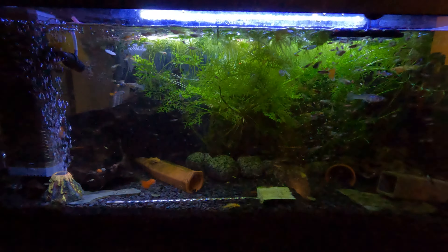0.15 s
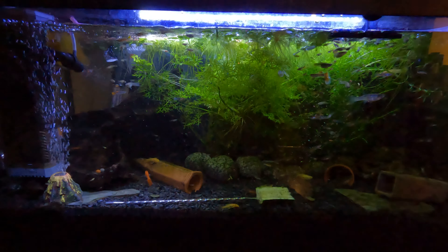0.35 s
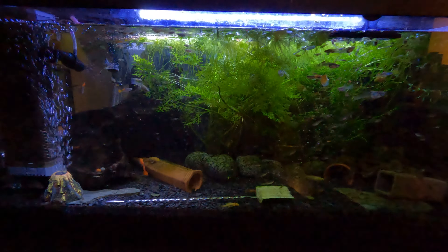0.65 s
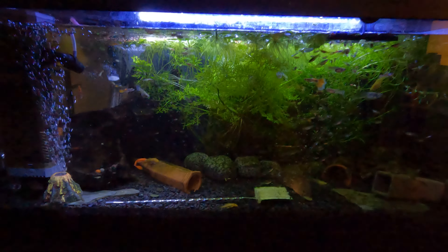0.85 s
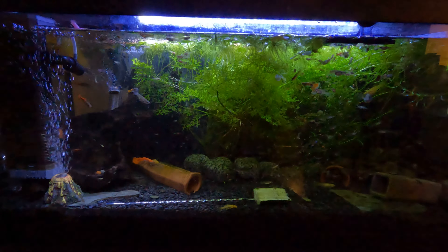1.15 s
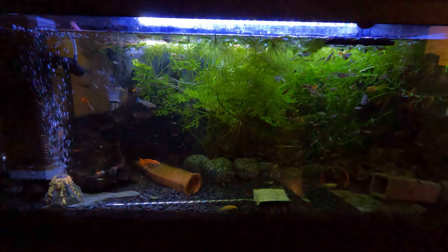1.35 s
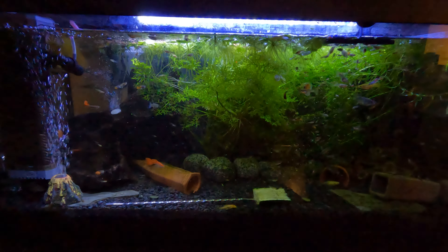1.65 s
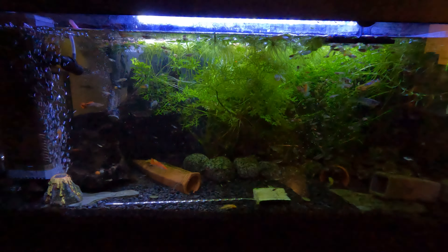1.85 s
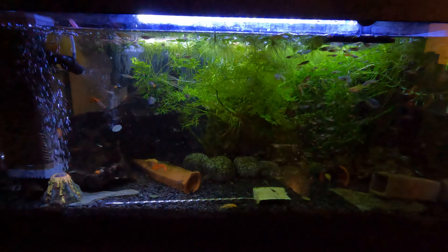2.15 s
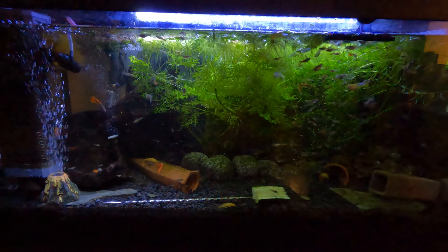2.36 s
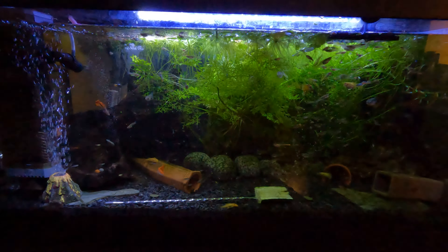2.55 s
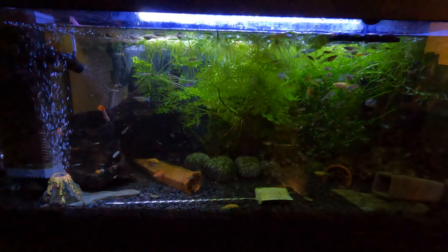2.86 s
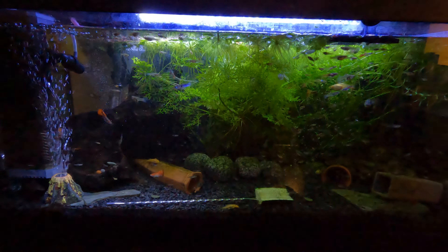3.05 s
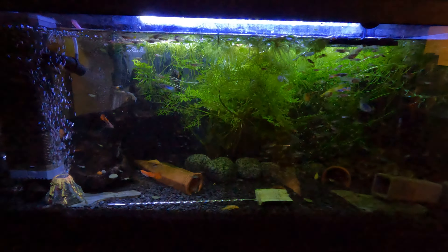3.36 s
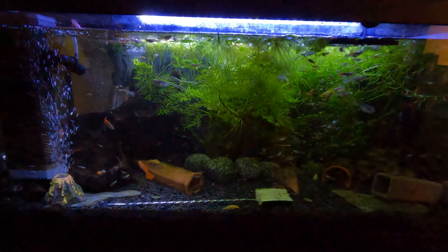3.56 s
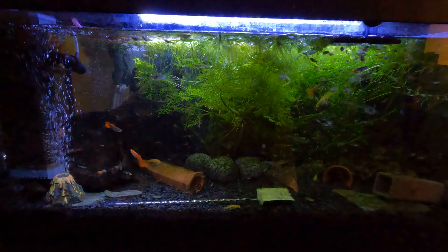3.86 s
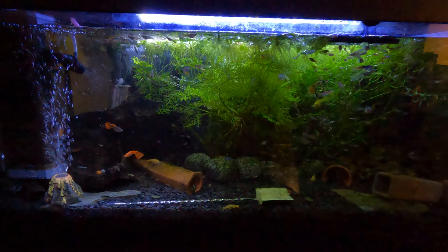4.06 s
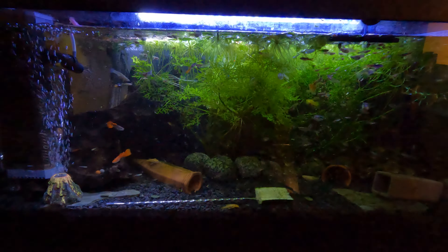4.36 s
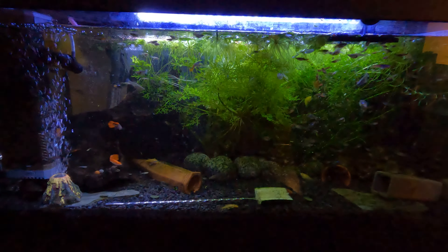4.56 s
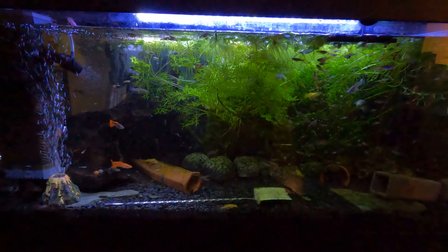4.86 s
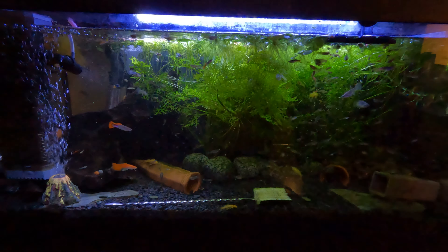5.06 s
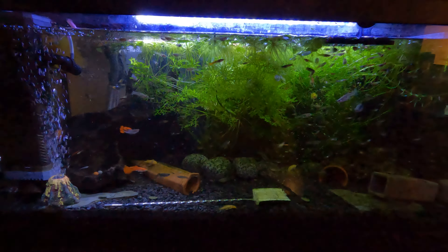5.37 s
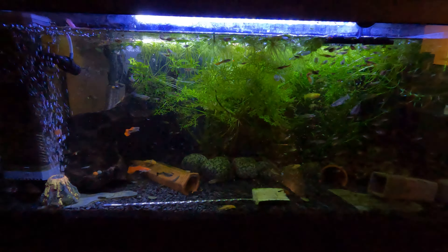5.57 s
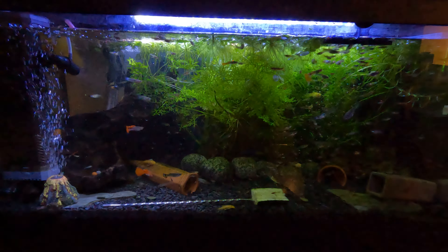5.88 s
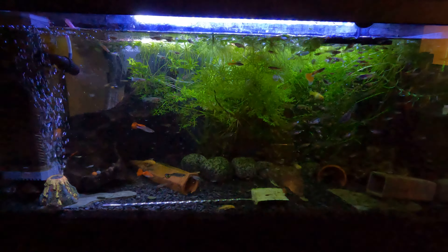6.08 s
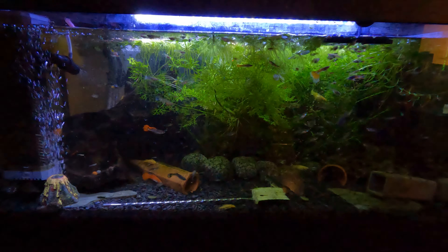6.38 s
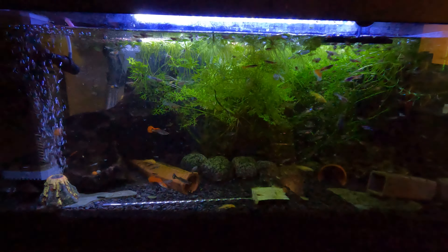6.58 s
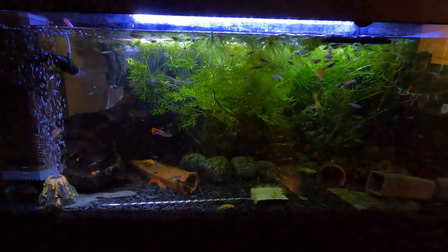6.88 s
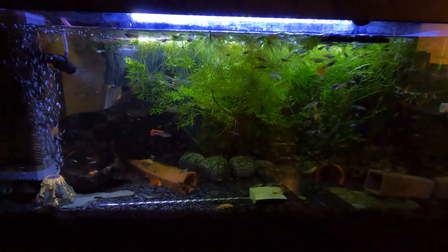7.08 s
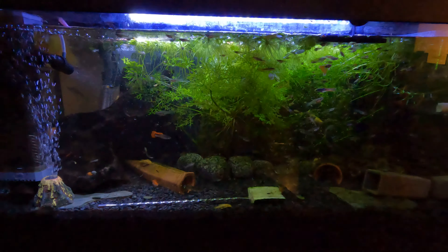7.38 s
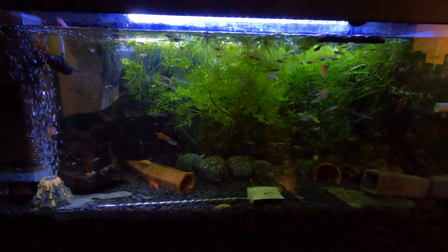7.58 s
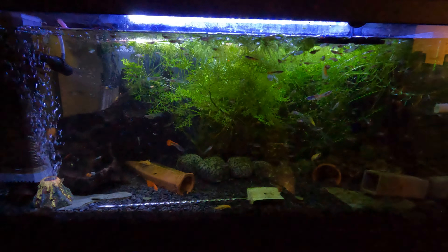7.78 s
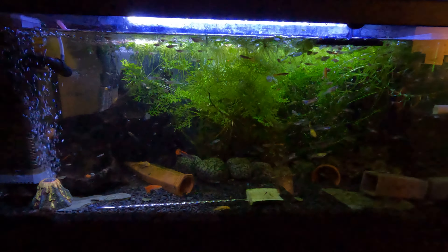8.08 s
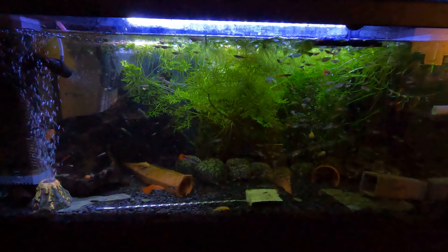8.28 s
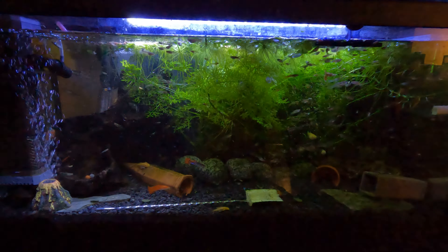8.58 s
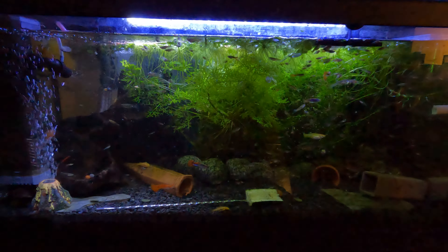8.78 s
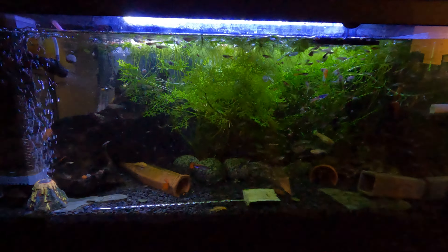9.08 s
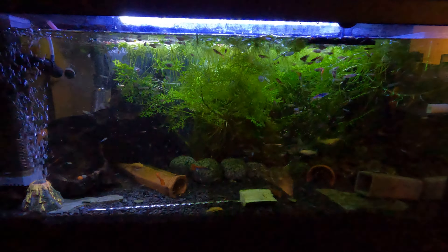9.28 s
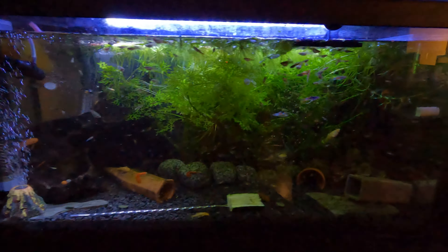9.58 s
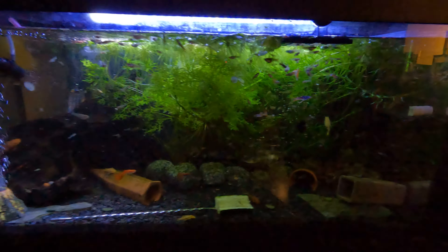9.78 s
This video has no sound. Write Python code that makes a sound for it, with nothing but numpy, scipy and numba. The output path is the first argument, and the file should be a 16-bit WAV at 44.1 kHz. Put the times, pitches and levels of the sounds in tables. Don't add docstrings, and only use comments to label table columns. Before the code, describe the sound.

An aquarium air pump hums low and steady while bubbles pop, tick and fizz at the water surface in uneven surges.

```python
import sys
import numpy as np
from scipy import signal
from scipy.fft import rfft, irfft
from scipy.io import wavfile
from scipy.ndimage import uniform_filter1d
from numba import njit

SR = 44100
rng = np.random.default_rng(int(sys.argv[2]) if len(sys.argv) > 2 else 0)


def generate_wav(sig):
    pcm = np.round(np.clip(np.atleast_2d(sig).T, -1, 1) * 32767).astype(np.int16)
    wavfile.write(sys.argv[1], SR, pcm)


def boost_factor(decibels):
    exponent = np.asarray(decibels, float) / 20
    return 10 ** exponent


N = 437913

# centre_hz, width_hz, gain_db
LID_MODES = [(810, 170, 0), (1230, 14, 0.5), (1132, 24, 0.5), (1428, 115, 5), (1530, 78, 3),
             (2340, 250, 1.5), (3640, 41, 6), (4120, 66, 3), (5087, 87, 2.5), (6380, 130, -5),
             (6805, 240, -5.5)]
# freq_hz, density_db_per_hz
SURFACE_COLOUR = [(510, -23.5), (860, -15.5), (1210, -7), (1450, -11.5), (1670, -12.5), (1960, -8.5),
                  (2410, -3), (2920, 0), (3590, -2), (4920, 2), (6050, -1.5), (6820, 9.5), (8280, -12),
                  (11800, -17.5), (15600, -36)]
SPOTS = 6
CLOSE_DB = -5


def surface():
    gulp_db, large_db, middling_db, fine_db = stream()
    tiny = signal.butter(4, 3100, "high", fs=SR, output="sos")
    heard = 0
    for spot in range(SPOTS):
        here = slice(spot, None, SPOTS)
        gulps = swarm(gulp_db - 8.5, 388, 631, cycles=0.99, spread_db=1.3, glide=0.082, count=350)
        large = swarm(large_db - 12.5, 883, 1590, cycles=2.94, spread_db=3.06, glide=0.035, count=450)
        middling = swarm(middling_db - 12, 1640, 3420, cycles=1.5, spread_db=3.8, glide=0.018, count=600)
        fine = swarm(fine_db - 15, 3190, 8850, cycles=3.6, spread_db=3.9, glide=0.025, count=1500)
        spray = swarm(fine_db - 23.5, 10000, 15800, cycles=3.4, spread_db=5, glide=0.022, count=1200)
        mist = swarm(-75, 3070, 13060, cycles=2.4, spread_db=5.5, glide=0., count=6000)
        small = signal.sosfilt(tiny, fine + spray + mist + film_tears(TEARS[here]))

        popped = large_bursts(louder(LARGE[here], -4.5))
        popped = popped + middling_bursts(louder(MIDDLING[here], -2.5))
        popped = popped + signal.sosfilt(tiny, small_pings(louder(SMALL[here], -2.5)))
        heard = heard + tank(gulps + large + middling + small + popped)
        heard[0] += boost_factor(CLOSE_DB) * popped

    lid_db = lambda hz: humps(LID_MODES, hz) + 0.5 * on_log(SURFACE_COLOUR, hz) + 4.22
    return pair(*colour(heard, lid_db))


# start_s, peak_db, pitch_hz
LARGE_BUBBLES = [(0.113, -44.5, 1540), (0.192, -45, 1140), (0.213, -47, 945), (0.282, -46, 1540),
                 (0.408, -49, 953), (0.483, -41, 1230), (0.583, -57, 1410), (0.645, -48, 1040),
                 (0.691, -50, 1240), (0.818, -46, 1250), (1.057, -49, 1160), (1.129, -45, 1510),
                 (1.206, -43, 1240), (1.308, -50, 1530), (1.641, -36, 1230), (1.709, -42, 939),
                 (1.954, -44, 1220), (2.211, -43, 1230), (2.255, -43.5, 1230), (2.305, -46, 1240),
                 (2.365, -48, 1220), (2.435, -44.5, 1230), (2.487, -50, 1230), (2.519, -41.5, 1460),
                 (2.648, -53, 1196), (2.684, -45.5, 1240), (2.847, -46.5, 1400), (2.907, -46, 1150),
                 (2.994, -55, 1530), (3.021, -48, 1210), (3.067, -46.5, 1230), (3.108, -47, 1130),
                 (3.162, -42, 1250), (3.255, -52, 1090), (3.293, -42, 1400), (3.365, -46, 1157),
                 (3.504, -49, 1400), (3.639, -52, 982), (3.738, -48, 1230), (3.808, -45, 1530),
                 (3.869, -43, 1390), (3.888, -42, 1404), (4.048, -48, 1200), (4.089, -43.5, 1400),
                 (4.13, -43.5, 1120), (4.333, -44, 1210), (4.376, -42, 1160), (4.532, -49, 1230),
                 (4.591, -41, 1210), (4.65, -44, 1210), (4.709, -44, 1230), (4.755, -46, 1230),
                 (4.9, -50, 1210), (4.962, -51, 1130), (5.001, -53, 1150),
                 (5.001, -53, 1390), (5.132, -46, 1480), (5.405, -40, 1520), (5.501, -47, 1230),
              (5.65, -42.5, 1230), (5.69, -53, 1010), (5.713, -46, 1230), (5.838, -54, 1020),
              (5.94, -47, 1030), (6.101, -49, 1220), (6.146, -42, 1470), (6.199, -49, 1290),
              (6.294, -51, 1150), (6.329, -48, 1220), (6.579, -50, 1020), (6.638, -49, 1220),
              (6.794, -42, 1380), (6.845, -51, 1030), (6.868, -45, 1280), (7.078, -35, 1230),
              (7.193, -46, 1010), (7.215, -51, 1180), (7.338, -49, 1210), (7.45, -51, 1210),
              (7.537, -44, 1410), (7.563, -46, 1530), (7.71, -39.5, 1306), (7.77, -38, 1530),
              (7.905, -52, 1320), (7.953, -49, 1390), (8.1, -48, 1090), (8.135, -43.5, 1463),
              (8.191, -44, 1200), (8.22, -35, 1530), (8.302, -50, 1210), (8.394, -50, 1230),
              (8.512, -49, 1230), (8.561, -43, 1510), (8.598, -45, 1220), (8.988, -48, 1450),
              (9.13, -44, 1270), (9.192, -53, 1230), (9.235, -49, 1220), (9.352, -52.5, 1430),
              (9.481, -48, 1340), (9.535, -40, 1310), (9.684, -55, 1250), (9.739, -49, 1460),
              (9.861, -48, 960), (9.917, -45, 1210)]
LARGE = LARGE_BUBBLES


def large_bursts(rows):
    start_s, peak_db, pitch_hz = np.transpose(rows)
    start = (start_s * SR).astype(int)
    cycles = 6.2 * (0.5 + rng.random(len(start)))
    ring = grains(start, pitch_hz, cycles, boost_factor(peak_db + 0.1), 0.009)
    return ring + dull_tick(start, peak_db + 1)


# start_s, peak_db, pitch_hz
MIDDLING = [(0.109, -44, 2450), (0.1496, -46, 2400), (0.4827, -43.5, 2460), (0.5893, -47.5, 3150),
            (0.8948, -46, 2480), (1.482, -49.5, 3140), (1.6177, -54, 3130), (2.833, -46.5, 2430),
            (2.992, -43, 3300), (3.1605, -42.5, 3240), (3.2868, -48, 2430), (3.5, -49, 2220),
            (3.6361, -57, 2170), (3.7878, -41.5, 3150), (3.8654, -44, 2900), (4.0701, -64, 3270),
            (4.7557, -45.5, 1880), (5.002, -50, 2180), (5.4064, -44, 3120), (5.498, -50, 3110),
            (6.295, -45.5, 3080), (6.548, -50, 2730), (6.867, -40.5, 2340), (6.9112, -40.5, 2600),
            (7.078, -40, 2150), (7.1092, -38, 2500), (8.2064, -39.5, 2330), (8.7754, -49.5, 2430),
            (8.964, -49.5, 2340), (9.4983, -51.5, 2710)]
# freq_hz, level_db
OVERTONES = [(2400, -12), (3640, -12), (4830, 0.5), (6800, 2), (9500, -6)]


def middling_bursts(rows):
    start_s, peak_db, pitch_hz = np.transpose(rows)
    count = len(start_s)
    start = (start_s * SR).astype(int)
    chance = rng.random((count, 14)).T
    out = grains(start, pitch_hz, 6.4 * (0.5 + chance[0]), boost_factor(peak_db - 5.5), 0.004)
    out += dull_tick(start, peak_db + 9)
    again = start + (SR * (0.0055 + 0.02 * chance[1])).astype(int)
    again_hz = pitch_hz * (0.85 + 0.3 * chance[2])
    out += grains(again, again_hz, np.full(count, 5.0), boost_factor(peak_db - 6), 0.01)
    for k, (tone_hz, tone_db) in enumerate(OVERTONES):
        size = boost_factor(peak_db + tone_db - 5 - 8.5 * chance[3 + k])
        detuned_hz = tone_hz * (0.946 + 0.067 * chance[8 + k])
        out += grains(start, detuned_hz, np.full(count, 8.1), size, 0.)
    return out


# start_s, peak_db, pitch_hz
SMALL_BUBBLES = [(0.0498, -40, 3950), (0.1106, -36, 3450), (0.2957, -51, 4420), (0.4005, -50, 4830),
                 (0.4833, -41, 3670), (0.5556, -52, 3640), (0.8165, -46, 5040), (0.8854, -47, 4200),
                 (1.043, -36, 4800), (1.2885, -47, 4970), (1.3094, -44, 4820), (1.481, -38, 4750),
                 (1.618, -36, 4910), (2.0393, -50.5, 3670), (2.148, -39, 4120), (2.2114, -39, 4830),
                 (2.4379, -50, 4050), (2.5242, -47, 4820), (2.6249, -48, 4820), (2.6858, -51, 3630),
                 (2.9088, -40.5, 4800), (3.1438, -42, 5030), (3.1622, -43, 4810), (3.2819, -38, 4110),
                 (3.3643, -51, 4450), (3.5009, -37, 4160), (3.5932, -52, 4940), (3.7888, -38, 4150),
                 (3.8626, -42, 4320), (3.932, -44.5, 4490), (3.9465, -43, 4840), (4.0412, -38, 4900),
                 (4.0701, -44, 4950), (4.0881, -44, 4820), (4.1285, -44, 4110), (4.1594, -47, 4120),
                 (4.2313, -40.5, 4810), (4.3745, -42, 3570), (4.4079, -46, 6590), (4.4538, -46, 3920),
                 (4.5775, -41, 3730), (4.6453, -41, 3880), (4.7022, -45, 3700), (4.7566, -51, 4430),
                 (4.8614, -40.5, 6700),
                 (5.2243, -38, 7700), (5.4075, -44, 3900), (5.5007, -47, 4820), (5.5551, -44, 4140),
              (5.6459, -44, 3670), (5.808, -49, 4970), (5.9395, -39, 4820), (6.011, -45, 6840),
              (6.1143, -48, 4380), (6.223, -48, 5540), (6.5498, -44, 3310), (6.5688, -38, 4800),
              (6.8461, -48, 7110), (6.866, -48, 3530), (6.905, -39, 4820), (6.9265, -36.5, 6600),
              (7.0567, -43, 4770), (7.0811, -36, 3600), (7.5336, -47, 3700), (7.6453, -45, 4850),
              (7.7087, -41.5, 3670), (7.7675, -43, 4100), (7.8893, -47, 4810), (7.9461, -42, 4820),
              (8.0309, -48, 3660), (8.1307, -44.5, 3580), (8.1821, -51, 4090), (8.2165, -39, 6900),
              (8.2855, -43, 6840), (8.3707, -46, 4840), (8.4575, -41, 3620), (8.4964, -43, 3570),
              (8.5413, -44, 3640), (8.5612, -43, 4820), (8.5964, -39.5, 3610), (8.7738, -45, 3480),
              (8.7942, -41, 4170), (8.9123, -42.5, 7140), (8.9708, -38, 3560), (9.0771, -46, 4950),
              (9.1559, -43, 6690), (9.2292, -42, 3870), (9.3265, -44, 7270), (9.3509, -53, 4010),
              (9.4767, -45, 3970), (9.5116, -39, 6640), (9.5926, -42, 3600), (9.6812, -46, 4760),
              (9.751, -40, 4800), (9.9157, -42, 7000)]
SMALL = SMALL_BUBBLES


def small_pings(rows):
    start_s, peak_db, pitch_hz = np.transpose(rows)
    count = len(start_s)
    start = (start_s * SR).astype(int)
    chance = rng.random((count, 14)).T
    out = grains(start, pitch_hz, 11 * (0.5 + chance[0]), boost_factor(peak_db - 9), 0.0016)
    tick_hz = 8000 * 1.45 ** chance[1]
    out += grains(start, tick_hz, np.full(count, 1.3), boost_factor(peak_db - 10 * chance[2]), 0.)
    for k, (tone_hz, _) in enumerate(OVERTONES[1:4]):
        size = boost_factor(peak_db - 9 - 8.8 * chance[3 + k])
        detuned_hz = tone_hz * (0.97 + 0.06 * chance[8 + k])
        out += grains(start, detuned_hz, np.full(count, 10.0), size, 0.)
    return out


# start_s, peak_db
TEARS = [(1.0425, -66), (1.6182, -58), (2.1301, -61), (2.1924, -54), (3.4835, -55), (3.6321, -59),
         (3.7873, -54), (4.0357, -48), (5.4016, -55), (7.887, -58), (8.2601, -51), (8.5972, -42.5),
         (8.9725, -48), (9.0768, -47), (9.3267, -48)]


def film_tears(rows):
    start_s, peak_db = np.transpose(rows)
    start = (start_s * SR).astype(int)
    cycles = np.full(len(start), 3.4)
    out = 0
    for low_hz, chance in zip((7300, 10500), rng.random((len(start), 2)).T):
        out = out + grains(start, low_hz * (1 + 0.47 * chance), cycles, boost_factor(peak_db + 11), 0.)
    return out


def dull_tick(start, peak_db):
    count = len(start)
    return grains(start, np.full(count, 2600.0), np.full(count, 0.26), boost_factor(peak_db), 0.)


def louder(rows, db):
    return np.array(rows) + [0, db, 0]


# time_s, level_db
AIR_FLOW = [(0.0, -55), (0.83, -61.5), (3.07, -58), (3.84, -61.5), (4.04, -59.5), (5.97, -60.5),
            (6.06, -60), (6.91, -60), (6.99, -59), (7.74, -59), (8.13, -56), (8.82, -63), (9.23, -59),
            (9.93, -60)]
# start_s, length_s, level_db, middling_share_db
SURGES = [(0.11, 0.12, -65, 4), (0.478, 0.032, -57, -22), (0.807, 0.098, -53, -9),
          (1.03, 0.14, -49.5, -4.5), (1.625, 0.23, -51, -2.5), (1.928, 0.022, -56.5, 2),
          (2.18, 0.15, -52.5, -5), (2.43, 0.1, -55, -27), (2.696, 0.072, -47.5, -7),
          (2.841, 0.36, -53.5, -7), (3.274, 0.14, -51, -6), (3.498, 0.054, -48, -10),
          (3.795, 0.15, -53.5, -2.5), (4.056, 0.16, -50.5, -9), (4.31, 0.14, -57, -2),
          (4.566, 0.27, -56, 2), (5.123, 0.032, -46, -13), (5.4, 0.22, -55, -8), (5.655, 0.052, -56, -2),
          (6.15, 0.069, -52, -11), (6.293, 0.062, -57, 1), (6.567, 0.071, -50, -10),
          (6.79, 0.153, -53, -21), (7.055, 0.17, -48.5, -7), (7.514, 0.047, -51.5, 1), (7.7, 0.11, -52, -5),
          (8.13, 0.16, -45, -12), (8.507, 0.096, -52.5, -8), (9.11, 0.088, -48.5, -10),
          (9.487, 0.15, -52.5, -4)]
# start_s, length_s, level_db
GULPS = [
    (1.683, 0.091, -52.5),
    (1.847, 0.11, -54.5),
    (3.245, 0.054, -58),
    (6.848, 0.035, -56),
    (7.084, 0.054, -55),
    (7.183, 0.052, -58),
    (7.544, 0.054, -55),
    (7.766, 0.04, -59),
    (8.205, 0.048, -57),
]
SURGE_ATTACK_S, SURGE_T60_S = 0.0093, 0.17
FROTH_ATTACK_S, FROTH_HOLD_S, FROTH_T60_S = 0.003, 0.004, 0.16
CALM_DB, SURGE_DB, FROTH_DB = (-3.5, -7.5, 0.7), (-9, -6.5, -3), (-10.5, -12.5, -14.5)


def stream():
    air_db = np.interp(np.arange(N) / SR, *np.transpose(AIR_FLOW))
    start_s, length_s, level_db, share_db = np.transpose(SURGES)
    big = swell(start_s, length_s, level_db, SURGE_ATTACK_S, SURGE_T60_S)
    small = swell(start_s, length_s, level_db + share_db, SURGE_ATTACK_S, SURGE_T60_S)

    start_s, length_s, level_db = np.transpose(GULPS)
    gulping = swell(start_s, length_s, level_db - 2, SURGE_ATTACK_S, SURGE_T60_S)
    powers = [boost_factor(2 * -65) + gulping]
    for k, (surge, rows) in enumerate([(big, LARGE), (small, MIDDLING), (small, SMALL)]):
        start_s, peak_db, _ = np.transpose(rows)
        hold_s = np.full(len(start_s), FROTH_HOLD_S)
        froth = swell(start_s, hold_s, peak_db + FROTH_DB[k], FROTH_ATTACK_S, FROTH_T60_S)
        calm = boost_factor(2 * (air_db + CALM_DB[k]))
        powers.append(calm + boost_factor(2 * SURGE_DB[k]) * surge + froth)
    return 10 * np.log10(powers)


def swell(start_s, hold_s, level_db, attack_s, t60_s):
    power = np.zeros(N)
    for s, hold, peak_db in zip(start_s, hold_s, level_db):
        first = max(int((s - 4 * attack_s) * SR), 0)
        last = min(int((s + hold + t60_s) * SR), N)
        t = np.arange(first, last) / SR - s
        fall_db = 60 * np.maximum(t - hold, 0) / t60_s
        rise = np.exp(np.minimum(2 * t / attack_s, 0))
        power[first:last] += boost_factor(2 * (peak_db - fall_db)) * rise
    return power


def swarm(level_db, lo_hz, hi_hz, cycles, spread_db, glide, count):
    when, pitch, loud, ring = rng.random((count, 4)).T
    start = (when * N).astype(int)
    pitch_hz = lo_hz * (hi_hz / lo_hz) ** pitch
    size = boost_factor(np.minimum(-spread_db * np.log(loud + 1e-9), 13))
    return level(grains(start, pitch_hz, cycles * (0.5 + ring), size, glide), 0) * boost_factor(level_db)


@njit
def grains(start, hz, cycles, size, glide):
    out = np.zeros(N)
    for g in range(len(start)):
        step = 2 * np.pi * hz[g] / SR
        fade = np.exp(-hz[g] / SR / cycles[g])
        rise = 1 + glide * hz[g] / SR / cycles[g]
        a, phase = size[g], 0.
        for i in range(start[g], min(N, start[g] + int(6 * cycles[g] * SR / hz[g]))):
            out[i] += a * np.sin(phase)
            a *= fade
            phase += step
            step = min(step * rise, 3.)
    return out


TANK_T60_S, TREBLE_T60_SHARE = 0.13, 0.55
TANK_DIRECT, TANK_WET_DB = 0.46, 1


def tank(x):
    t = np.arange(int(0.4 * SR)) / SR
    noise = rng.standard_normal((2, len(t)))
    dull = signal.lfilter([0.3], [1, -0.7], noise)
    bright = 0.7 * (noise - dull)
    tail = dull * boost_factor(-60 * t / TANK_T60_S) + bright * boost_factor(-60 * t / (TREBLE_T60_SHARE * TANK_T60_S))
    tail = tail / np.sqrt(np.sum(tail ** 2, axis=1, keepdims=True)) * boost_factor(TANK_WET_DB)
    tail[0, 0] = TANK_DIRECT
    return signal.fftconvolve(x[None], tail, axes=1)[:, :N]


# mains_multiple, level_db, left_minus_right_db
PUMP_PARTIALS = [(1, -50, 0), (2, -44, 0), (3, -54, 0), (4, -47, .8), (5, -63, .3), (6, -68, -.5),
                 (8, -74, 4), (10, -77, 6), (14, -77.5, 2), (18, -76, 2), (20, -80, 5), (22, -82, 3)]
MAINS_HZ, STROKE_START_S, CABINET_LAG_RAD = 49.953, 0.01421, 0.45


def pump():
    turn = 2 * np.pi * MAINS_HZ * (np.arange(N) / SR + STROKE_START_S)
    out = 0
    for k, level_db, pan_db in PUMP_PARTIALS:
        wave = -np.sqrt(2) * np.sin(k * turn - CABINET_LAG_RAD * k ** 2)
        tone = wave * boost_factor(level_db + 1.18 * walk(2.51))
        out = out + tone * boost_factor(np.array([[pan_db], [-pan_db]]) / 2)
    return out


# freq_hz, density_db_per_hz
RUMBLE_COLOUR = [(10, -18), (17, -0.5), (40, 5.5), (62, -19), (85, -11), (125, -13.5), (165, -6.5),
                 (225, -15), (300, -14.5), (420, -20.5), (600, -38), (850, -47.5), (1500, -43),
                 (16000, -86)]
# centre_hz, width_hz, gain_db
FLOW_HUMPS = [(67.5, 8, 14.5), (126, 8.8, 9), (157, 29, 4), (178, 36, 0), (214.6, 39, 8.5), (277, 15, 8),
              (327, 27, 4.5)]
# start_s, peak_db
NUDGES = [
    (3.42, -37.5),
    (9.549, -37),
]


def rumble():
    rumble_db = lambda hz: on_log(RUMBLE_COLOUR, hz) + humps(FLOW_HUMPS, hz)
    noise = colour(rng.standard_normal((2, N)), rumble_db)
    out = level(pair(*noise), -48.5) * boost_factor(walk(2.9))
    t = np.arange(N) / SR
    for start_s, peak_db in NUDGES:
        push = np.exp(-((t - start_s - 0.05) / 0.1) ** 2)
        out = out + boost_factor(peak_db) * push * np.sin(2 * np.pi * 14.7 * (t - start_s))
    return out


# freq_hz, density_db_per_hz
STIR_COLOUR = [(10, -7), (18, -1), (35, -10), (60, -10), (100, -18), (130, -36), (300, -61), (16000, -86)]


def stir():
    t = np.arange(N) / SR
    jolt_db = sum(11 * np.exp(-((t - start_s - 0.06) / 0.079) ** 2) for start_s, _ in NUDGES)
    push = colour(rng.standard_normal(N), lambda hz: on_log(STIR_COLOUR, hz))
    return level(push, -59.5) * boost_factor(jolt_db + 1.2 * walk(1.4)) * np.array([[1], [-1]])


# freq_hz, left_minus_right_db, likeness_0_to_1
PORTS = [(60, 0, .93), (300, .3, .92), (700, 1.5, .75), (1300, 2.8, .72), (1900, 2.3, .5), (4400, 3.2, .62),
         (8000, 6, .35), (10500, 3, .9), (12500, 3, .25), (15000, 2, .5)]


def pair(mid, side):
    like = lambda hz: np.clip(on_log(PORTS, hz, column=2), 0.01, 0.99)
    mid = colour(mid, lambda hz: 10 * np.log10((1 + like(hz)) / 2))
    side = colour(side, lambda hz: 10 * np.log10((1 - like(hz)) / 2))
    left = colour(mid + side, lambda hz: on_log(PORTS, hz) / 2)
    right = colour(mid - side, lambda hz: -on_log(PORTS, hz) / 2)
    return np.array([left, right])


def on_log(table, hz, column=1):
    rows = np.array(table, float)
    return np.interp(np.log(hz + 1), np.log(rows[:, 0]), rows[:, column])


def humps(table, hz):
    return sum(gain_db / (1 + (2 * (hz - f) / width) ** 2) for f, width, gain_db in table)


def colour(x, db_at):
    size = 2 ** 15
    ceps = irfft(np.log(boost_factor(db_at(np.arange(size // 2 + 1) * SR / size))))
    ceps[1:size // 2] *= 2
    ceps[size // 2 + 1:] = 0
    response = irfft(np.exp(rfft(ceps)))
    response = response.reshape((1,) * (x.ndim - 1) + (-1,))
    return signal.fftconvolve(x, response, axes=-1)[..., :N]


def level(x, db):
    return x * boost_factor(db) / np.sqrt(np.mean(x ** 2))


def walk(rate_hz):
    k = int(SR / rate_hz)
    held = np.repeat(rng.standard_normal(N // k + 1), k)
    return 0.57 * uniform_filter1d(uniform_filter1d(held, k), k)[:N]


def scene():
    return surface() + pump() + rumble() + stir()


def top_cut(x):
    return signal.sosfilt(signal.butter(12, 15700, fs=SR, output="sos"), x)


NOTCH_HZ, NOTCH_WIDTH_HZ, NOTCH_DB = 14650, 900, -9
TOP_BAND_HZ, TOP_CUT_HZ, TOP_DROPS_PER_S = 14250, 15700, 16


def record(dry):
    notch = [(NOTCH_HZ, NOTCH_WIDTH_HZ, NOTCH_DB)]
    ported = colour(dry, lambda hz: humps(notch, hz) - 60 * (hz > TOP_CUT_HZ))
    top_band = signal.butter(10, TOP_BAND_HZ, "high", fs=SR, output="sos")
    top = signal.sosfiltfilt(top_band, ported)
    dropped = uniform_filter1d(1.0 * (walk(TOP_DROPS_PER_S) > 0.17), size=400)
    return top_cut(ported - dropped * top)


dry = scene()
out = record(dry)
generate_wav(out)
```